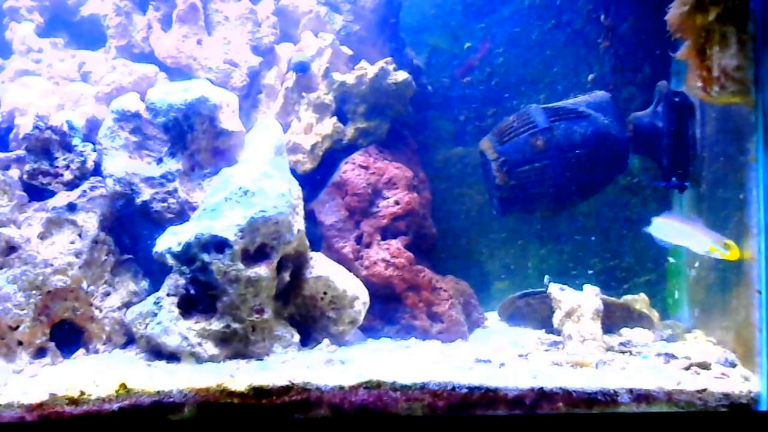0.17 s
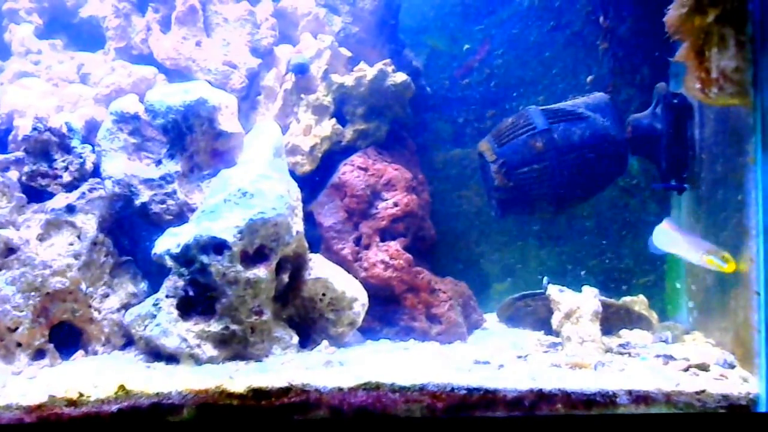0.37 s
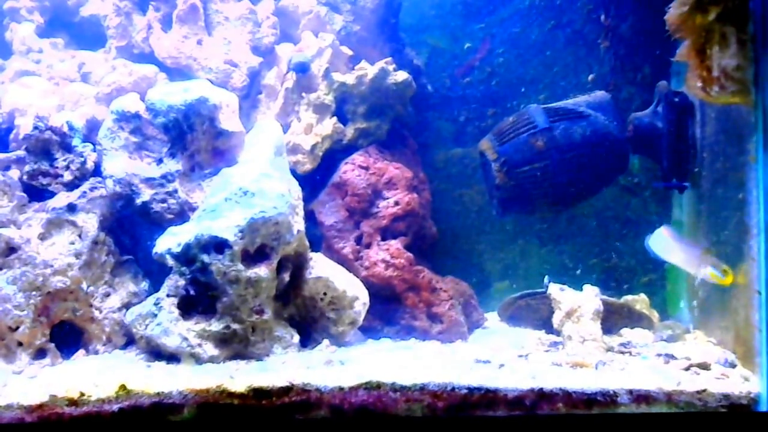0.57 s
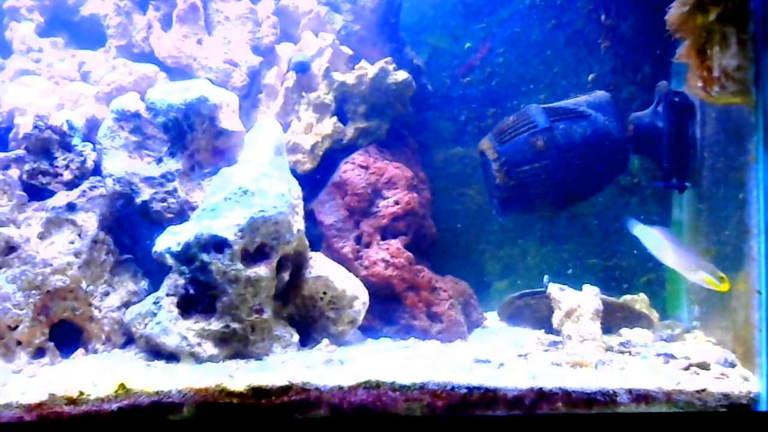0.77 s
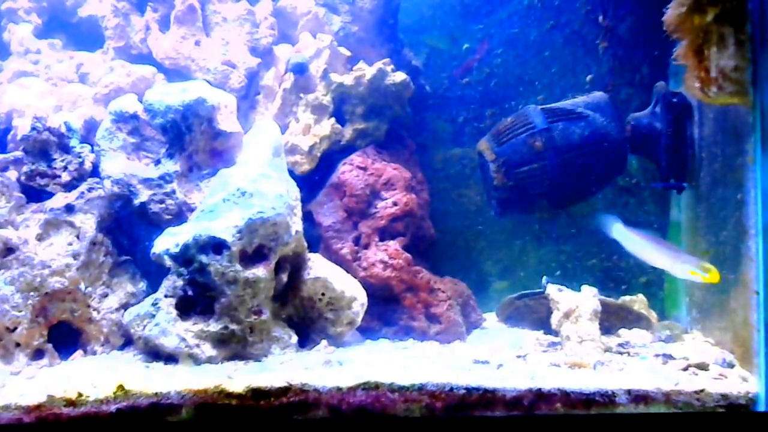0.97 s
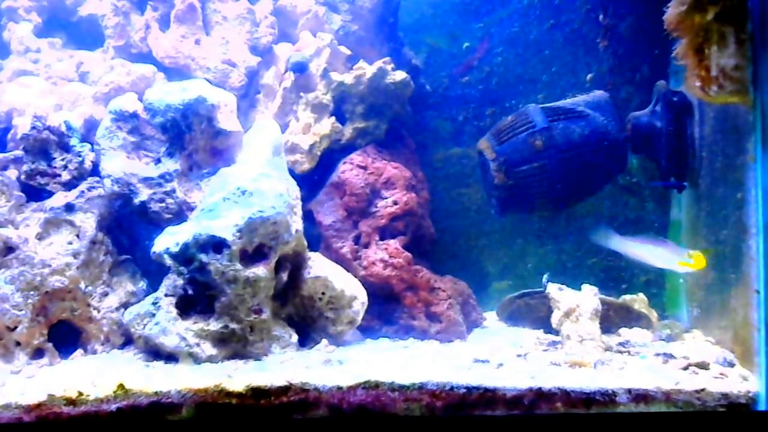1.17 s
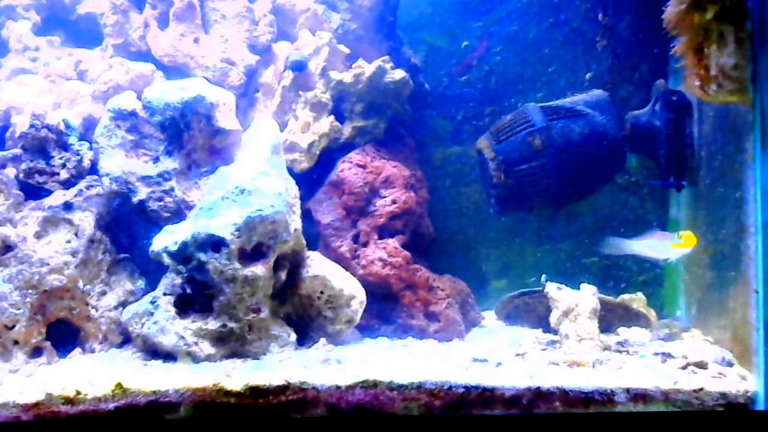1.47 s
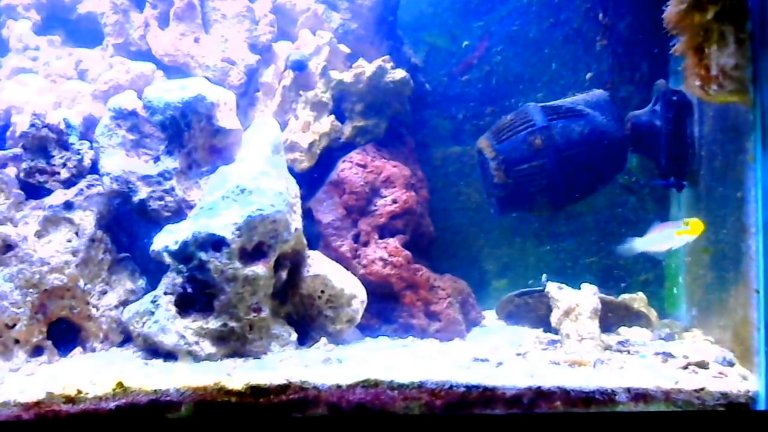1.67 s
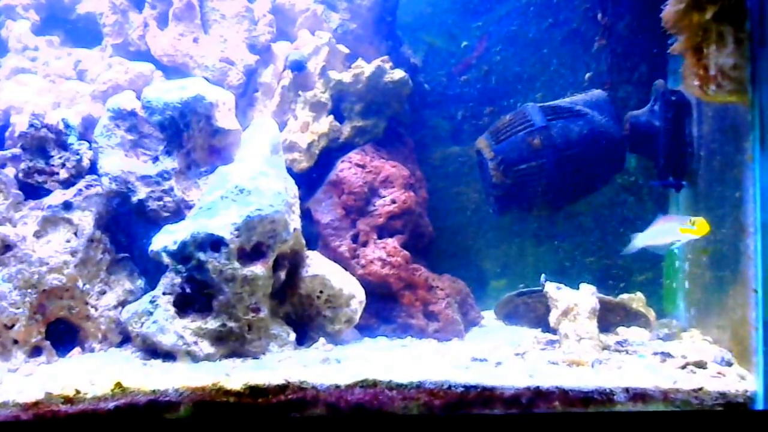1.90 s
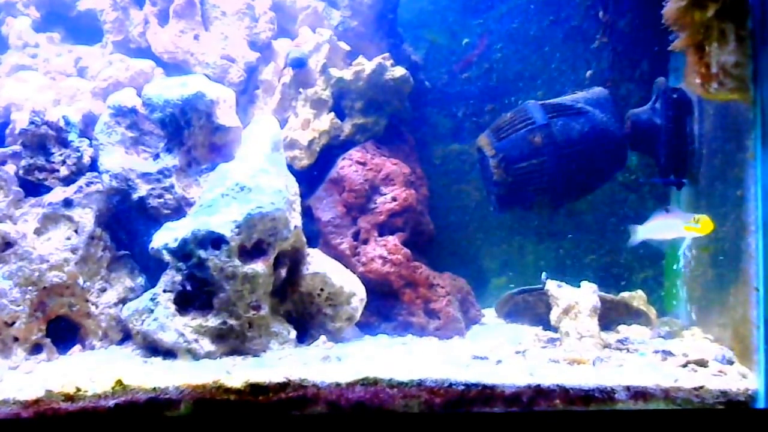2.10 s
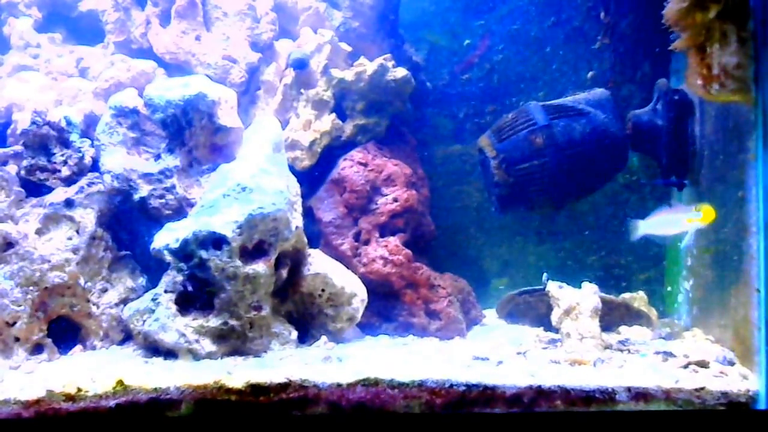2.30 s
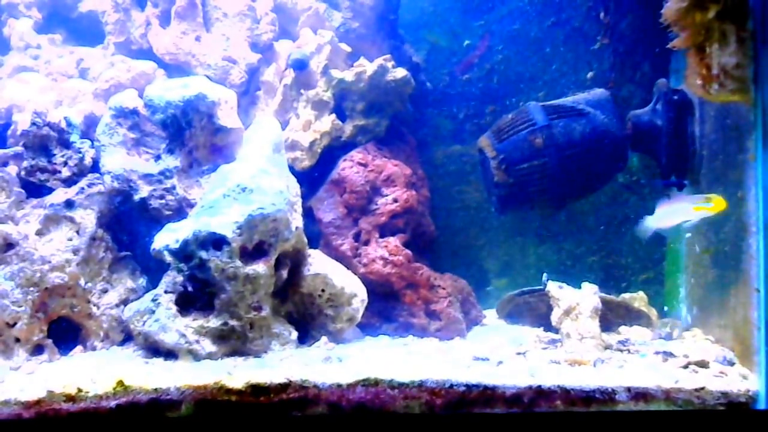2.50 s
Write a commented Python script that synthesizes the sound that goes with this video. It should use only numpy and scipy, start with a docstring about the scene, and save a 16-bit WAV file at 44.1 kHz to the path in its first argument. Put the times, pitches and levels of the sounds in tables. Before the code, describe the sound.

Water trickles and bubbles in a home aquarium filter, with small splashes over faint pump hum

```python
"""Water trickles into the covered filter chamber of a home aquarium. Throughout, a pump hums at twice the
mains frequency over a rush of water, with faint fizz and gurgle from many small damped sines.
From 0.07 s air bubbles pop and from 0.11 s droplets splash, in runs of damped sines that ring the chamber's air:
a few bass modes and a dense flutter above. A strong bubble comes at 0.85 s, the strongest splash at 1.08 s,
a high bubble at 1.71 s; the last splash starts at 2.60 s. The small microphone is dull above 8 kHz."""
import sys
import numpy as np
from scipy import signal
from scipy.fft import rfft, irfft, next_fast_len
from scipy.io import wavfile
from scipy.ndimage import uniform_filter1d, map_coordinates

SR = 44100
rng = np.random.default_rng(int(sys.argv[2]) if len(sys.argv) > 2 else 0)


def digitize_waveform(pressure):
    """Quantize a signal to 16-bit integers and store it at the path in sys.argv[1].

    Rows of a 2-D input are taken as channels; values are limited to [-1, 1].
    """
    field = np.atleast_2d(pressure).T
    bounded = np.clip(field, -1, 1)
    quanta = np.round(bounded * 32767).astype(np.int16)
    wavfile.write(sys.argv[1], SR, quanta)


N = 116865

# Bursts of air bubbles: t/s, level/dB (8 dB above the crest of the short-time rms), f/Hz at the crest,
# life of a pop/cycles, burst length/s, position of the crest (0-1), climb/octaves per burst
BUBBLE_BURSTS = [(0.071, -50.5, 2240, 2.5, 0.0041, 0.33, 0.35), (0.1002, -51.5, 2640, 2.3, 0.011, 0, 0.05),
                 (0.2255, -47, 1515, 5.5, 0.003, 0.24, 0.0026),
                 (0.2504, -49, 1480, 3.8, 0.012, 0.96, 0.018), (0.2523, -36.5, 734, 7, 0.015, 0.33, 0.12),
                 (0.2804, -47.5, 591, 5, 0.012, 0.43, 0.057), (0.3897, -47, 605, 4.7, 0.019, 1, -0.013),
                 (0.3983, -50.5, 2040, 4.6, 0.0048, 0.9, 0.13), (0.4117, -53, 1150, 11, 0.016, 0.3, -0.041),
                 (0.425, -48.5, 726, 10.4, 0.031, 1, 0.012), (0.4304, -51, 2780, 3.5, 0.0032, 0.15, 0.089),
                 (0.466, -35.5, 626, 3.7, 0.0072, 0, 0.23), (0.484, -37.5, 616, 2.3, 0.006, 0.1, -0.077),
                 (0.4637, -46, 1300, 4.5, 0.029, 0.2, 0.055), (0.5174, -49.5, 605, 1.9, 0.014, 1, 0.24),
                 (0.5417, -40, 718, 3.1, 0.022, 0.53, 0.0052), (0.5446, -45.5, 1293, 7.2, 0.0066, 0.1, 0.1),
                 (0.5976, -43.5, 1600, 6.6, 0.00637, 0.54, 0.02),
                 (0.603, -51.5, 995, 8.9, 0.0091, 0.5, 0.16), (0.612, -50, 2420, 3.4, 0.014, 0.2, 0.12),
                 (0.684, -39, 1208, 7.1, 0.013, 0.25, 0.022), (0.7453, -45, 526, 2.8, 0.015, 0.96, -0.2),
                 (0.7483, -52, 1520, 5.4, 0.033, 0.53, 0.22), (0.815, -52, 253, 5, 0.015, 0.3, 0.19),
                 (0.8096, -48.5, 864, 4.8, 0.008, 0.06, -0.067),
                 (0.8465, -32.5, 739, 4.5, 0.007, 0.33, 0.14), (0.862, -51, 1000, 3.6, 0.0049, 0, -0.051),
                 (0.9293, -53.5, 830, 2.6, 0.0023, 1, 0.36), (0.9887, -51.5, 1500, 2.3, 0.0069, 0.5, 0.042),
                 (1.027, -43, 732, 4, 0.0076, 0.5, 0.0077), (1.04, -40, 570, 5.4, 0.018, 0.44, -0.25),
                 (1.076, -50.5, 620, 2.34, 0.014, 0.69, 0.3), (1.196, -46, 726, 3.1, 0.021, 0.27, -0.36),
                 (1.26, -42.5, 514, 3.8, 0.018, 0.34, 0.32), (1.2874, -38, 594, 2.46, 0.016, 0.42, 0.044),
                 (1.3065, -43.5, 946, 3.7, 0.017, 0.33, 0.38), (1.3409, -53.5, 690, 5.1, 0.02, 0.2, 0.28),
                 (1.3609, -53, 1540, 6.6, 0.013, 0.9, 0.076), (1.4855, -45, 770, 4.7, 0.014, 0.2, -0.28),
                 (1.4929, -52, 610, 2.8, 0.032, 0.75, 0.23),
                 (1.4986, -50.5, 1570, 5.9, 0.0033, 0.5, 0.0088),
                 (1.588, -46, 2360, 1.5, 0.014, 0.24, 0.34), (1.7115, -33, 2420, 4.5, 0.00503, 0.02, 0.06),
                 (1.7453, -42.5, 585, 4.2, 0.014, 0.22, 0.16), (1.7595, -45.5, 916, 10.6, 0.012, 0, 0.23),
                 (1.779, -59.5, 240, 5.6, 0.031, 0.77, 0.13), (1.7953, -49.5, 563, 3.6, 0.014, 0.7, 0.053),
                 (1.824, -38, 640, 1.95, 0.027, 0.75, 0.22), (1.8407, -49, 1255, 8.2, 0.014, 0.52, 0.14),
                 (1.8901, -51.5, 2570, 11.4, 0.0091, 0.37, 0.38),
                 (1.9152, -51.5, 641, 5.4, 0.012, 0, 0.076), (1.9394, -44, 1260, 5.4, 0.0086, 0, 0.11),
                 (2.0074, -53, 500, 3.5, 0.028, 0.84, 0.003), (2.0315, -50.5, 790, 3.6, 0.0092, 1.0, 0.22),
                 (2.0553, -39, 1585, 4.05, 0.035, 0.54, 0.037), (2.075, -46, 2086, 6.2, 0.024, 0.4, 0.036),
                 (2.0795, -46.5, 817, 4.9, 0.016, 0.04, -0.28), (2.144, -61, 255, 3.1, 0.024, 0.33, 0.041),
                 (2.1491, -52.5, 1540, 7.9, 0.012, 0.6, -0.049),
                 (2.1614, -49.5, 570, 3.3, 0.053, 0.24, 0.18), (2.203, -42, 553, 6.6, 0.012, 0.36, 0.061),
                 (2.227, -39, 574, 3.1, 0.01677, 0.39, 0.17), (2.3234, -56, 276, 2.2, 0.048, 0.57, -0.011),
                 (2.371, -36, 740, 6.1, 0.0071, 0.1, -0.026), (2.394, -42.5, 760, 3.3, 0.016, 0.07, 0.14),
                 (2.385, -50, 976, 6.1, 0.013, 0.34, 0.1), (2.4379, -48.5, 2645, 6.5, 0.007, 0.7, 0.094),
                 (2.48, -48, 1171, 9.6, 0.013, 0.96, 0.16), (2.5267, -53, 2530, 8.9, 0.0044, 0.64, -0.066),
                 (2.5591, -54, 665, 4.7, 0.0062, 0.27, 0.3)]
# Droplet splashes: t/s, level/dB, f/Hz, life/cycles, burst length/s, position of the crest (0-1), as above
DROPLET_SPLASHES = [(0.1145, -44, 6000, 0.77, .0083, 1), (0.201, -39, 7530, 4.6, .018, 0.7),
                    (.222, -42.5, 3130, 1.4, .01, 0), (0.2433, -28.5, 6220, 1.4, .008, 0.1),
                    (0.284, -31, 7000, 4.6, .01, 0), (.286, -51.5, 10900, 2.4, .016, 0.1),
                    (0.401, -52, 7040, 6.5, .012, 0.7), (0.448, -46.5, 7530, 2.4, .0054, 1),
                    (0.5528, -39, 9240, 3.4, .005, 0.12), (.5531, -56, 12700, 3.5, .008, 0),
                    (0.6025, -40.5, 7260, 15, .037, 0), (0.7805, -46, 8450, 1.5, .014, 0),
                    (0.7826, -44.5, 3180, 10, .0098, 0.07), (0.825, -40.5, 5250, 6.8, .011, 0),
                    (.8281, -39, 3640, 1.2, .0064, 0.4), (0.8936, -39.5, 9400, 2.1, .01, 0.36),
                    (.9732, -32.5, 8450, 2.6, .008, 0.33), (0.969, -44, 12000, 2.3, 0.013, 0.6),
                    (1.0772, -24, 5650, 3.3, 0.0033, 0.11), (1.1626, -47.5, 5060, 5, .024, 0.95),
                    (1.192, -46.5, 5800, 0.88, .016, 0.47), (1.246, -44, 4770, 12, .0086, .25),
                    (1.261, -41, 3190, 12, .012, 0.57), (1.275, -35.5, 5060, 15.4, .0057, 0.02),
                    (1.301, -40.5, 6600, 5, .0074, 0), (1.3799, -50.5, 7600, 4.2, .006, 0.6),
                    (1.582, -47.5, 6900, 1.2, .012, 0.4), (1.599, -44.5, 7900, 2.1, .013, 0.2),
                    (1.612, -52, 4660, 2.8, .012, 0.6), (1.628, -39.5, 3000, 0.8, .014, 0.58),
                    (1.631, -32.5, 7100, 0.57, 0.018, 0.47), (1.675, -38, 6400, 3.4, .019, .5),
                    (1.703, -51.5, 9800, 9.2, .0049, 0.15), (1.699, -45, 5860, 3.9, .006, .3),
                    (1.775, -38.5, 6900, 0.78, .0085, 0.27), (1.7885, -40.5, 4930, 4.8, .0079, 0),
                    (1.872, -48, 6430, 2.2, .008, 0.1), (1.8807, -45, 4830, 7.7, .011, .46),
                    (1.978, -51, 6160, 1.7, .01, 0), (2.042, -40, 7600, 12, .006, 0.1),
                    (2.086, -52.5, 9500, 1, .02, 0.76), (2.129, -46, 7400, 3.5, .02, 0.74),
                    (2.1546, -39.5, 5060, 14, .002, 0), (2.234, -44.5, 7900, 0.83, .016, .7),
                    (2.293, -54, 12200, 6, .0055, 0.1), (2.302, -51, 6640, 2.6, .008, 0.8),
                    (2.34, -64, 7140, 2.6, .004, 0.4), (2.384, -52.5, 4360, 0.98, .012, 0),
                    (2.415, -49.5, 6960, 1.5, .008, 0.2), (2.443, -43, 4570, 5, .016, 0.32),
                    (2.512, -51, 6600, 1.2, .006, .2), (2.533, -48, 6650, 1.2, .03, 0.76),
                    (2.572, -51.5, 3110, 12, .0061, 0.4), (2.603, -52, 5200, 4, .0018, 0.36)]
# Air modes of the chamber: f/Hz, relative level/dB, t60/s
AIR_MODES = [(508, -16, 0.37), (589.7, -2, 0.08), (641, -14.5, 0.1), (748.8, 4, 0.055), (891, -16, 0.13),
             (948, -6.5, 0.056), (1031, 3, 0.029), (1186, -1, 0.047), (1495, -2.5, 0.026),
             (1857, -14.5, 0.082), (2256, -11, 0.11), (2427, -7, 0.032)]
# Decay of the dense reflections: f/Hz, t60/s
FLUTTER_DECAY = [(800, 0.27), (2500, 0.094), (6000, 0.079), (9000, 0.13), (13000, 0.038)]
# Response of the microphone to the water's events: f/Hz, relative level/dB
MIC_RESPONSE = [(20, -51), (150, 11.5), (300, -7.5), (7000, 16), (9000, 2.5), (11000, -8.5), (16000, -24)]
# Pump hum: f/Hz, level/dB rms
PUMP_HUM = [(119.7, -73)]
# Spectrum of the rush of water: f/Hz, relative level/dB per Hz
RUSH_SPECTRUM = [(12, -57), (20, -28), (64, -22), (87, -18.5), (119, -8), (282, -9), (440, -11.5),
                 (581, -3.5), (835, -9.5), (1200, -8.5), (2030, -10.5), (6740, -11.5), (15500, -43)]

# Pops and their bursts
ONSET_CYCLES = 0.9  # a bubble starts softly
RISE = 0.12  # pitch rise within a pop, as a fraction of its pitch per life
SCATTER_OCTAVES, SCATTER_DB = 0.07, 1  # standard deviations between the pops of a burst
OFF_CREST_DB = 16  # fall per burst length away from the crest
DROP_CLIMB_OCTAVES = 0.047  # per burst

# Chamber
DIRECT_DB, FLUTTER_DB, MODES_DB = 3, 9.5, -20
FLUTTER_FROM_HZ, FLUTTER_RISE_S, FLUTTER_LUMPS_DB = 850, 0.0005, 4
MODE_SPREAD_DB = 2.5  # random spread of mode strength between responses
STOP_S, STOP_WIDTH_S, STOP_DB = 0.031, 0.0078, -3.5  # a quick extra drop in the ringing

# Trickle
FIZZ_PER_S, FIZZ_HZ, FIZZ_OCTAVES, FIZZ_CYCLES = 200, 6570, 0.717, 2.5
FIZZ_SPREAD_DB, FIZZ_DB = 15, -65
GURGLE_PER_S, GURGLE_HZ, GURGLE_OCTAVES, GURGLE_CYCLES = 120, 1115, 1.101, 6
GURGLE_SPREAD_DB, GURGLE_DB = 2, -68

# Background
RUSH_DB, RUSH_PATCHY_DB = -62.5, 2.5
TOP_HZ = 15700  # band limit


def bubbles():
    """Volume resonance: each air bubble rings as a damped sine at its own pitch."""
    return bursts(BUBBLE_BURSTS, count=5)


def droplets():
    """Impact resonance: splashes ring like bubbles, mostly higher, with a slight climb in pitch."""
    return bursts([(*row, DROP_CLIMB_OCTAVES) for row in DROPLET_SPLASHES], count=5)


def bursts(table, count):
    """Superposition: a quick run of pops, convolved with a randomly varied chamber response."""
    start, db, hz, cycles, length, crest_at, climb = np.transpose(table)[..., None]
    timing, loudness, tuning = rng.standard_normal((3, len(start), count))
    position = np.arange(count) * (1 + 0.10186 * timing) / (count - 1)
    position = np.clip(position, 0, 1.1)
    gain = amp(SCATTER_DB * loudness - OFF_CREST_DB * abs(position - crest_at))
    pitch = hz * 2 ** (SCATTER_OCTAVES * tuning + climb * (position - crest_at))
    run = pops(pitch, cycles, size=4096, late=position * length)
    dry_bursts = (run * gain[..., None]).sum(axis=1)
    wet = signal.fftconvolve(dry_bursts, chamber(count=len(start)), axes=1)
    lead = 128  # samples of room for the microphone filter
    wet = microphone(np.pad(wet, ((0, 0), (lead, 0))))
    power = abs(uniform_filter1d(wet ** 2, size=300))
    crest = np.sqrt(power.max(axis=1, keepdims=True))
    return laid(wet * amp(db - 8) / crest, start[:, 0] - lead / SR)


def pops(hz, cycles, size, late=0):
    """Damped oscillation: sines of rising pitch, one row each, starting late seconds in."""
    hz = np.asarray(hz)[..., None]
    life = np.maximum(cycles, 0.5)[..., None]
    late = np.asarray(late)[..., None]
    u = np.maximum(np.arange(size) / SR - late, 0) * hz  # time in cycles
    # The pitch rises for three lives, then stays 12 percent above nominal
    phase = u * (1 - RISE / 2 + RISE / 2 * np.minimum(u / life, 3))
    envelope = np.exp(-u / life) * (1 - np.exp(-u / ONSET_CYCLES))
    fade = np.hanning(2 * size)[size:]
    return np.sin(2 * np.pi * phase) * envelope * fade


def chamber(count):
    """Room acoustics: responses of direct sound, flutter and modes, one random variation per row."""
    size = SR // 5
    t = np.arange(size) / SR
    mode_gain = amp(MODES_DB + MODE_SPREAD_DB * rng.standard_normal((count, len(AIR_MODES))))
    response = flutter(count, t) + mode_gain @ air_modes(t)
    response *= amp(STOP_DB * (1 + np.tanh((t - STOP_S) / STOP_WIDTH_S)) / 2)
    response[:, 0] += amp(DIRECT_DB)
    return response


def air_modes(t):
    """Standing waves: each mode is a sine that falls by 60 dB in its t60."""
    return np.array([amp(db - 60 * t / max(t60, 0.02)) * np.sin(2 * np.pi * hz * t)
                     for hz, db, t60 in AIR_MODES])


def flutter(count, t):
    """Diffuse reflection: lumpy noise that decays at a rate set by frequency."""
    size = len(t)
    hz, frames, z = signal.stft(rng.standard_normal((count, size)), SR, nperseg=128)
    t60 = np.maximum(along(FLUTTER_DECAY, hz), 0.02)[:, None]
    tail = signal.istft(z * amp(-60 * frames / t60), SR, nperseg=128)[1][:, :size]
    lumps = unit(uniform_filter1d(rng.standard_normal((count, size)), size=30))
    tail = tail * amp(FLUTTER_LUMPS_DB * lumps)
    tail = tail * (1 - np.exp(-t / FLUTTER_RISE_S))
    tail = filtered(tail, lambda f: f ** 4 / (f ** 4 + FLUTTER_FROM_HZ ** 4))
    return tail * amp(FLUTTER_DB) / np.linalg.norm(tail, axis=1, keepdims=True)


def microphone(x):
    """Transducer response: the small microphone colours the water's events."""
    return filtered(x, lambda f: amp(along(MIC_RESPONSE, f)))


def fizz():
    """Incoherent summation: many tiny droplets merge into a fine fizz."""
    return amp(FIZZ_DB) * swarm(FIZZ_PER_S, FIZZ_HZ, FIZZ_OCTAVES, FIZZ_CYCLES, FIZZ_SPREAD_DB, size=256)


def gurgle():
    """Incoherent summation: lower, longer pops merge into a gurgle."""
    return amp(GURGLE_DB) * swarm(GURGLE_PER_S, GURGLE_HZ, GURGLE_OCTAVES, GURGLE_CYCLES,
                                  GURGLE_SPREAD_DB, size=1024)


def swarm(per_s, hz, octaves, cycles, spread_db, size):
    """Random superposition: pops at random times, rms 1, shared among four random chamber responses."""
    count = round(per_s * N / SR)
    start = rng.random(count) * N / SR
    pitch = np.clip(hz * 2 ** (octaves * rng.standard_normal(count)), 150, 14000)
    gain = amp(spread_db * rng.random(count))
    rows = pops(pitch, np.full(count, cycles), size=size) * gain[:, None]
    wet = np.zeros(N)
    for k, response in enumerate(chamber(count=4)):
        wet += signal.fftconvolve(laid(rows[k::4], start[k::4]), response)[:N]
    return unit(microphone(wet))


def pump_hum():
    """Forced vibration: a sine at twice the mains frequency, nearly steady in level and phase."""
    t = np.arange(N) / SR
    hum = np.zeros(N)
    for hz, db in PUMP_HUM:
        level = amp(db + 0.72 * wobble(4.43)) * np.sqrt(2)  # rms to peak
        hum += level * np.sin(2 * np.pi * hz * t + 0.041 * wobble(3.4))
    return hum


def water_rush():
    """Broadband flow noise: shaped noise that breathes in patches of time and frequency."""
    z = signal.stft(rng.standard_normal(N), nperseg=512)[2]
    field = uniform_filter1d(rng.standard_normal(z.shape), size=14, axis=0)
    field = uniform_filter1d(field, size=6, axis=1)
    patchy = signal.istft(z * amp(RUSH_PATCHY_DB * unit(field)), nperseg=512)[1][:N]
    rush = unit(filtered(patchy, lambda f: amp(along(RUSH_SPECTRUM, f))))
    return amp(RUSH_DB + 1.53 * wobble(12.15)) * rush


def amp(db):
    """Level definition: dB to amplitude gain."""
    return 10 ** (np.asarray(db) / 20)


def unit(x):
    """Normalisation: scale to rms 1."""
    return x / np.sqrt(np.mean(x ** 2) + 1e-20)


def along(points, hz):
    """Interpolation: (f/Hz, value) points joined on a logarithmic frequency axis."""
    f, value = np.transpose(points)
    return np.interp(np.log(hz + 1), np.log(f + 1), value)


def wobble(rate):
    """Slow modulation: a smooth random curve with rate knots a second."""
    knots = rng.standard_normal(int(N * rate / SR) + 4)
    return map_coordinates(knots, [np.arange(N) * rate / SR])


def filtered(x, response):
    """Linear filtering: multiply the spectrum of x by a response of frequency."""
    n = x.shape[-1]
    m = next_fast_len(n + 8192)
    spectrum = rfft(x, m) * response(np.fft.rfftfreq(m, 1 / SR))
    return irfft(spectrum, m)[..., :n]


def laid(rows, start):
    """Superposition: sum rows into the timeline at their start times in seconds."""
    at = np.round(start * SR).astype(int)[:, None] + np.arange(rows.shape[1])
    return np.bincount(at.ravel(), rows.ravel(), N + SR)[:N]


def scene():
    """Superposition of all sources in one channel."""
    water = bubbles() + droplets() + fizz() + gurgle()
    return (water + pump_hum() + water_rush())[None]


def record(dry):
    """Band limitation: nothing is kept above the limit."""
    return filtered(dry, lambda hz: hz < TOP_HZ)


dry = scene()
out = record(dry)
digitize_waveform(out)
```